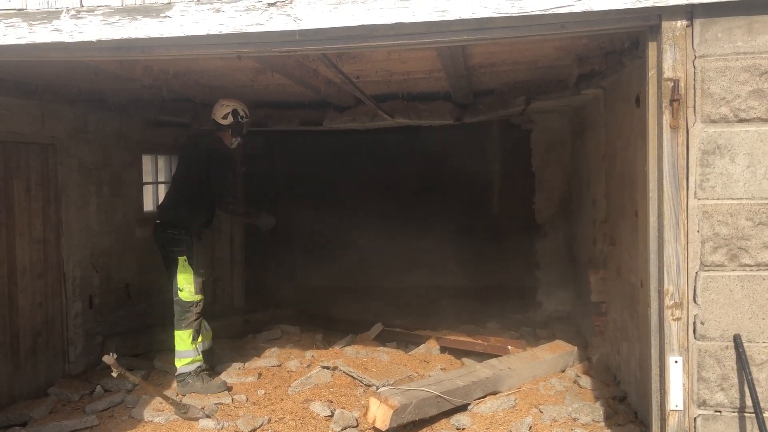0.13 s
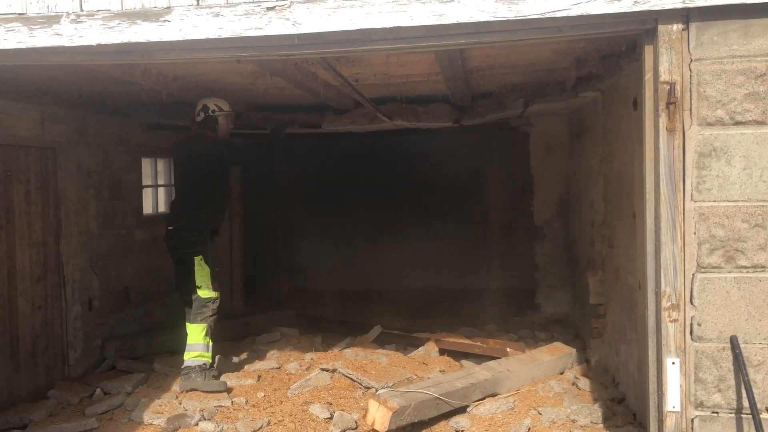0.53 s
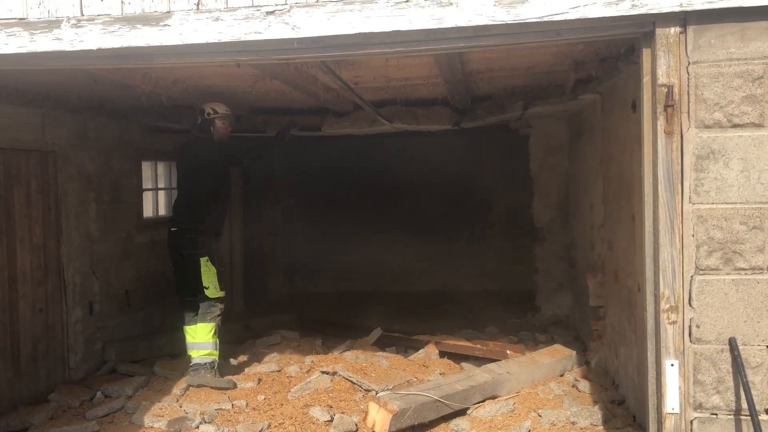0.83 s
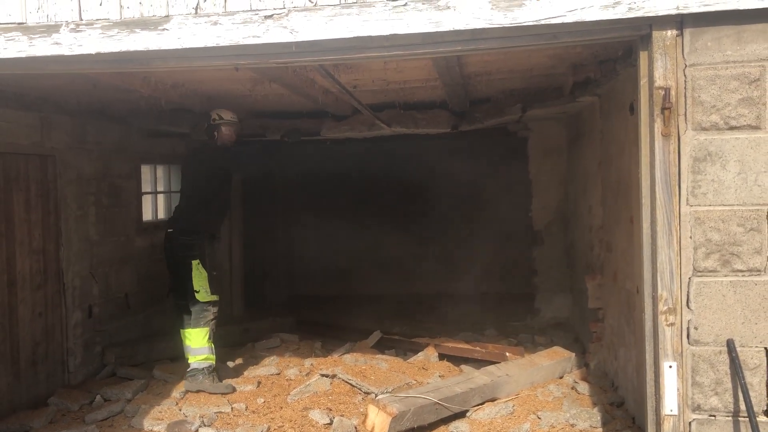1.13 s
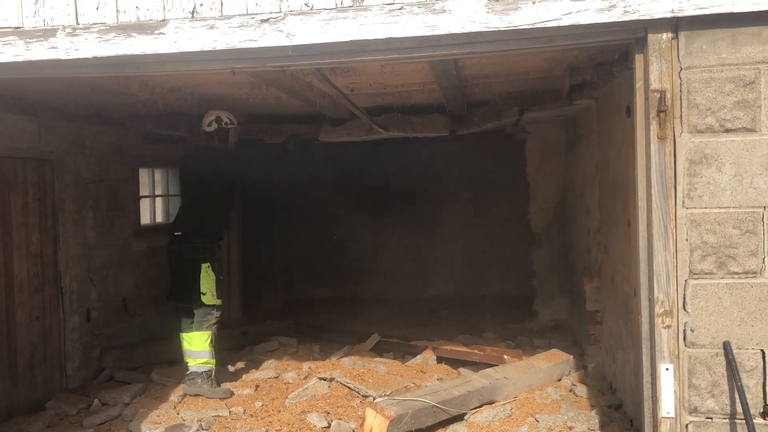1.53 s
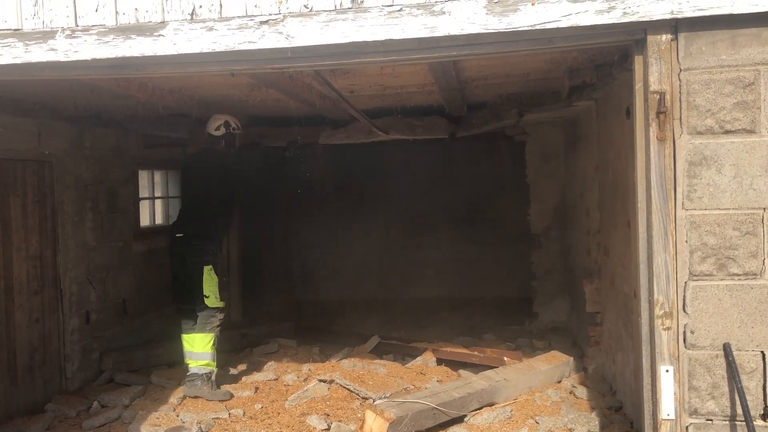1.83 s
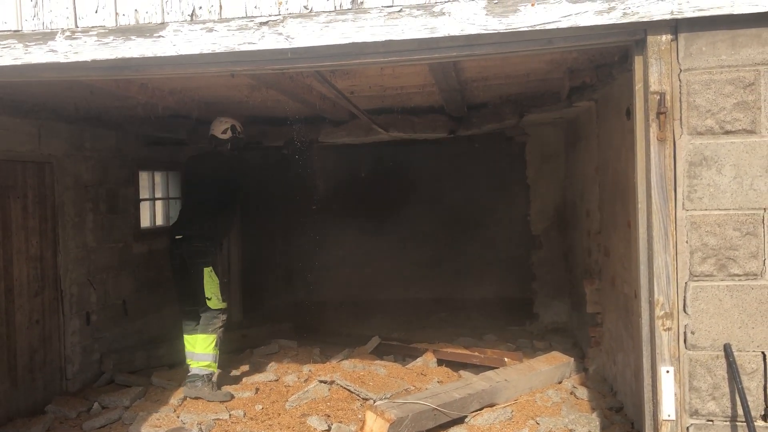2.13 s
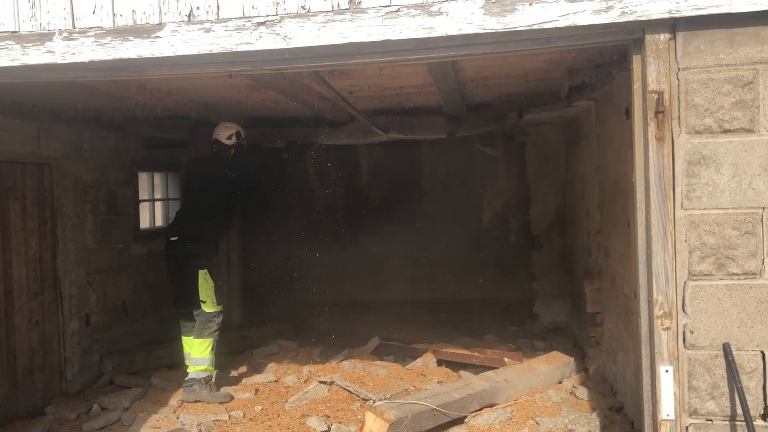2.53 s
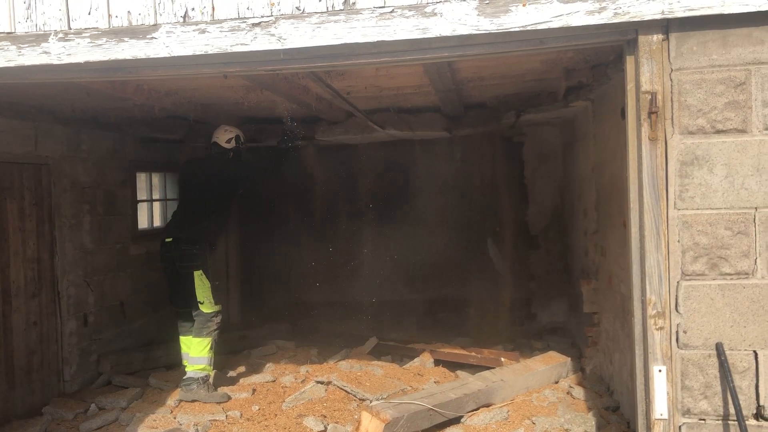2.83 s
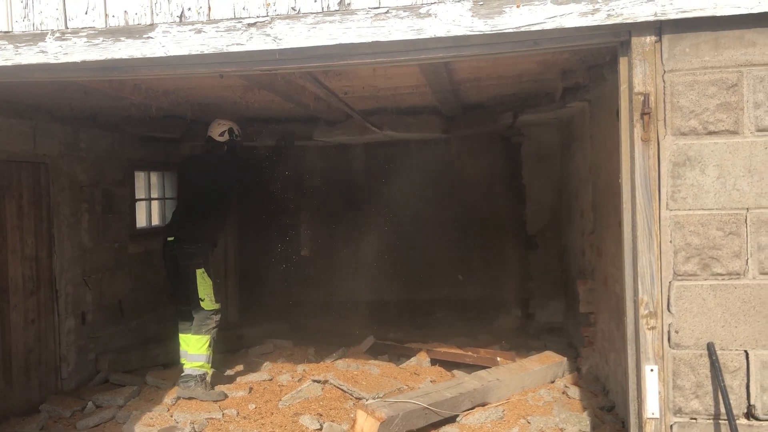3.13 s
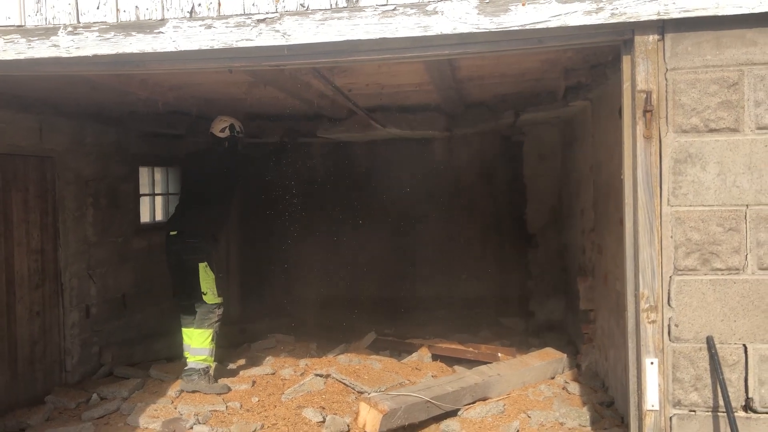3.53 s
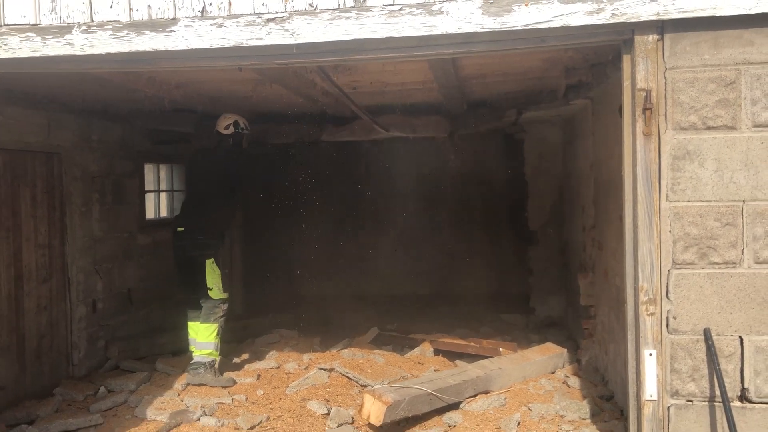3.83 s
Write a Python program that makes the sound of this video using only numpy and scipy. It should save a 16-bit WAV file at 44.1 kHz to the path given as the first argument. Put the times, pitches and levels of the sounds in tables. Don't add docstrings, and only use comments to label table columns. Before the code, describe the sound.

Falling debris, heard from outside a stone shed: a faint early knock, crumbs ticking, grit building, sharp dry creaks, then hard landings and board rattles near the end, with low wind buffeting the microphone.

```python
import sys
import numpy as np
from scipy import signal
from scipy.fft import rfft, irfft, next_fast_len
from scipy.io import wavfile
from scipy.ndimage import uniform_filter1d, map_coordinates

SR = 44100
rng = np.random.default_rng(int(sys.argv[2]) if len(sys.argv) > 2 else 0)


def boost(x):
    u = np.asarray(x, float) / 20
    return 10 ** u


def dump(signal):
    limited = np.clip(np.atleast_2d(signal).T, -1, 1)
    pcm = np.round(limited * 32767).astype(np.int16)
    wavfile.write(sys.argv[1], SR, pcm)


N = 176400


def unit(x):
    return x / np.sqrt(np.mean(x ** 2) + 1e-20)


def noise():
    return rng.standard_normal(N)


def along(points, hz):
    f, v = np.transpose(points)
    return np.interp(np.log(hz + 1), np.log(f + 1), v)


def curve(rows):
    s, db = np.transpose(rows)
    return boost(np.interp(np.arange(N) / SR, s, db))


def wobble(rate):
    knots = rng.standard_normal(int(5 * rate) + 4)
    return map_coordinates(knots, [np.arange(N) * rate / SR])


def filtered(x, response):
    m = next_fast_len(len(x) + 8192)
    return irfft(rfft(x, m) * response(np.fft.rfftfreq(m, 1 / SR)), m)[:len(x)]


def coloured(x, points):
    return unit(filtered(x, lambda hz: boost(along([(1, -120)] + list(points), hz))))


def resonant(x, peaks):
    def response(f):
        total = 0
        for k, (centre, width, db) in enumerate(peaks):
            damping = 1j * f * width
            total = total + (-1) ** k * boost(db) * damping / (centre * centre - f * f + damping)
        return total
    return filtered(x, response)


def crackle(per_s, scatter_db):
    chance, sign, size = rng.random((3, N))
    return (chance < per_s / SR) * np.sign(sign - .5) * boost(-scatter_db * np.log(size + 1e-9))


def add(out, s, x):
    part = out[max(round(s * SR), 0):][:len(x)]
    part += x[:len(part)]


def fading(rows):
    out, t = np.zeros(N), np.arange(SR // 2) / SR
    for s, db, t60 in rows:
        add(out, s, boost(db - 60 * t / abs(t60)))
    return out


# (time [s], peak [dB], body level [dB], ring t60 [s])
LANDINGS = [
    (0.342, -51, -18, 0.046),
    (.347, -35, 4.5, 0.1),
    (0.564, -41.5, -22, 0.12),
    (3.048, -25, -4.5, 0.047),
    (3.055, -30.5, -5, 0.041),
    (3.062, -34, 8.5, 0.073),
    (3.193, -36.5, -2, 0.11),
    (3.285, -37.5, 3.5, 0.16),
    (3.573, -38, 3.5, 0.065),
    (3.969, -43.5, 5.5, 0.18),
]
# (frequency [Hz], width [Hz], level [dB])
STONE_MODES = [(620, 200, 1), (1330, 370, 1), (1960, 820, -7), (2910, 590, -4.5)]
# (frequency [Hz], level [dB])
CRACK_COLOUR = [(1000, 9), (2500, -5.5), (6000, 3), (9000, -5.5), (13000, 0), (16000, -16)]


def knocks():
    crack_share = 0.44
    cracks = [(s, db, crack_share * t60) for s, db, _, t60 in LANDINGS]
    bodies = [(s, db + body_db, t60) for s, db, body_db, t60 in LANDINGS]
    crack = fading(cracks) * coloured(noise(), CRACK_COLOUR)
    body = fading(bodies) * unit(resonant(noise(), STONE_MODES))
    return crack + body


# (time [s], level [dB], pitch [Hz], t60 [s])
SCRAP_RINGS = [(3.053, -21.5, 196, .15), (3.0625, -26, 310, .1), (3.0615, -33, 2400, .06),
               (.116, -54, 2745, .18), (.114, -62, 4200, .1), (.535, -42, 1195, .05),
               (.349, -29, 1200, .09), (.348, -31, 1800, .06), (.36, -44, 2500, .2),
               (3.861, -43, 2880, .22), (3.621, -49, 900, 1.5), (3.66, -50, 715, .9),
               (3.289, -41, 4600, .08), (3.555, -43, 620, .2), (3.965, -41, 630, .15),
               (3.965, -44, 1210, .2), (3.153, -34, 1860, .09), (2.685, -43, 2400, .2),
               (3.962, -44, 6800, .08), (2.762, -36, 1950, .12), (3.6, -50, 5900, .7),
               (.648, -55, 3400, .15)]
# (frequency [Hz], level [dB])
BOARD_MODES = [(540, 0), (710, 1.5), (900, -1), (1070, 1), (1300, -1)]
# (time [s], level [dB])
BOARD_HITS = [
    (2.757, -43),
    (2.771, -37),
    (3.2508, -33),
    (3.258, -32),
    (3.269, -33.5),
    (3.3, -36),
    (3.459, -42),
    (3.565, -43),
]


def rings():
    board_t60_s, rise_s = 0.043, 0.00042
    rough_db, blur, blur_most = 2.5, 9, .04
    out, t = np.zeros(N), np.arange(SR // 2) / SR
    boards = [(s, db + level + 1.2 * rng.standard_normal(), hz, board_t60_s)
              for s, db in BOARD_HITS for hz, level in BOARD_MODES]
    rough, drift = wobble(90), wobble(160)
    for s, db, hz, t60 in list(SCRAP_RINGS) + boards:
        start = rng.integers(N - len(t))
        own = slice(start, start + len(t))
        drift_hz = min(blur / t60, blur_most * hz) * drift[own]
        envelope = boost(db - 60 * t / t60 + rough_db * rough[own]) * (1 - np.exp(-t / rise_s))
        phase = 2 * np.pi * np.cumsum(hz + drift_hz) / SR
        add(out, s, envelope * np.sin(phase))
    return out


# (time [s], length [s], level [dB], coarse crumbs relative level [dB])
SHOWERS = [(0.105, 0.029, -59.5, -17), (0.561, 0.037, -51.5, -22), (0.648, 0.021, -70, 10.5),
           (1.079, 0.091, -68, 7.5), (1.465, 0.096, -58.5, -2), (1.657, 0.088, -59.5, 3),
           (1.808, 0.11, -54.5, -1.5), (2.027, 0.084, -53, -2), (2.31, 0.042, -68, 7),
           (2.655, 0.024, -44, -12), (2.789, 0.028, -46.5, -15), (3.038, 0.02, -29.5, -9),
           (3.173, 0.068, -46, 1), (3.452, 0.025, -63, 18), (3.523, 0.066, -50, 9),
           (3.585, 0.096, -47.5, 5.5), (3.69, 0.11, -58.5, 8.5), (3.964, 0.071, -53, 12.5)]
# (frequency [Hz], level [dB])
COARSE_COLOUR = [(300, -77), (600, 8), (1200, 5.5), (2600, 3.5), (4500, -1), (8000, -13)]
# (frequency [Hz], level [dB])
GRIT_COLOUR = [(800, -22), (2000, 8.5), (3200, 8), (5500, 3), (8000, 2), (12500, 6.5), (15000, 1),
               (17000, -38)]


def crumbs(colour):
    impacts = crackle(2500, 2) + 0.25 * noise()
    return boost(1.8 * wobble(70)) * coloured(impacts, colour)


def showers():
    rise_share, fall_s = 0.43, 0.02
    t, fine, coarse = np.arange(SR // 3) / SR, np.zeros(N), np.zeros(N)
    for s, length, db, coarse_db in SHOWERS:
        rise = np.clip(t / (rise_share * length), 0, 1)
        fall = np.exp(-np.clip(t - length, 0, 1) / fall_s)
        shape = boost(db) * rise * fall
        add(fine, s, shape)
        add(coarse, s, boost(coarse_db) * shape)
    return fine * crumbs(GRIT_COLOUR) + coarse * crumbs(COARSE_COLOUR)


# (time [s], level [dB])
TRICKLE_LEVEL = [(0, -69.5), (.7, -66.5), (1.0, -72), (1.43, -66.5), (1.5, -64.5), (1.75, -58.5),
                 (2.02, -59.5), (2.3, -51), (2.55, -52), (2.85, -49), (3.0, -52.5), (3.2, -45), (3.5, -52),
                 (3.75, -51.5), (3.92, -52)]
GRAIN_HZ = [3500, 6500, 9500, 12800]


def trickle():
    grains = np.zeros(N)
    for hz in GRAIN_HZ:
        hiss = unit(resonant(noise(), [(hz, 0.51 * hz, 0)]))
        clicks = unit(resonant(crackle(90, 2), [(hz, 0.21 * hz, 0)]))
        grains += boost(1.33 * wobble(14)) * hiss + boost(-12 + 7.2 * wobble(8.2)) * clicks
    return curve(TRICKLE_LEVEL) * coloured(unit(grains) + 0.86 * noise(), GRIT_COLOUR)


# (time [s], peak [dB])
SINGLE_SLIPS = [(2.190, -37), (2.2715, -39), (2.277, -19), (2.2835, -20), (2.289, -25.5), (2.3255, -33),
                (2.364, -26.5), (2.370, -25), (2.54, -48), (2.608, -27), (2.615, -22), (2.6195, -25),
                (2.6265, -19.5), (2.632, -22), (2.634, -20), (2.639, -20), (2.6415, -25), (2.6465, -25),
                (2.6485, -20.5), (2.654, -17), (2.659, -17.5), (2.664, -24.5), (3.0275, -16.5), (3.033, -22),
                (3.041, -41)]
# (time [s], length [s], slip rate [1/s], level [dB])
SLIP_RUNS = [
    (1.872, .01, 150, -46),
    (2.229, .016, 610, -37),
    (2.7522, .037, 345, -26.5),
    (2.764, .024, 710, -35),
    (3.1505, .017, 385, -26),
    (3.946, .012, 130, -37),
    (3.968, .01, 170, -33),
]
# (frequency [Hz], width [Hz], level [dB])
CREAK_MODES = [(1364, 210, 10.5), (1933, 52, 13.5), (2110, 49, 1), (2420, 410, 1), (3770, 430, 3),
               (4700, 260, 2.5), (6540, 2100, -0.5), (10640, 1800, 3), (13150, 1900, 3.5)]


def creak():
    slip_t60_s, jitter = 0.0098, .12
    slips = list(SINGLE_SLIPS)
    for s, length, rate, db in SLIP_RUNS:
        chance = rng.standard_normal((40, 2))
        count = np.arange(40)
        times = (count + jitter * chance[:, 0] * (count > 0)) / rate
        slips += [(s + at, db + 0.9 * c) for at, c in zip(times, chance[:, 1]) if at < length]
    bursts = fading([(s, db, slip_t60_s) for s, db in slips]) * np.clip(noise(), -1, 1)
    return resonant(bursts, CREAK_MODES)


# (time [s], peak [dB])
TICKS = [(0.0868, -52), (0.2656, -49), (1.4813, -42), (1.504, -39), (1.522, -40), (1.6569, -30.5),
         (1.685, -43), (1.728, -42), (1.8118, -45), (1.854, -45), (1.9014, -38), (2.0527, -42),
         (2.0981, -41), (2.406, -42), (2.5342, -36.5), (2.5626, -48), (2.586, -34), (2.728, -33)]
# (frequency [Hz], width [Hz], level [dB])
TICK_MODES = [(5000, 9500, -7), (10100, 7400, 0.5), (13200, 3800, 2)]


def ticks():
    t60_s, level_db, echo_s, echo_db = .004, 6, .0056, -2
    clicks = []
    for s, db in TICKS:
        clicks.append((s, db + level_db, t60_s))
        clicks.append((s + echo_s, db + level_db + echo_db, t60_s))
    return resonant(fading(clicks) * np.sign(noise()), TICK_MODES)


# (frequency [Hz], t60 [s])
ROOM_T60 = [(300, 0.26), (2000, 0.35), (6000, 0.24), (14000, 0.26)]


def room(x):
    hz, t, z = signal.stft(rng.standard_normal(SR // 2), SR, nperseg=256)
    decay = boost(-60 * t / along(ROOM_T60, hz)[:, None])
    tail = signal.istft(z * decay, SR, nperseg=256)[1]
    delayed = np.pad(x, (250, 0))
    return signal.fftconvolve(delayed, tail / np.linalg.norm(tail))[:N]


# (time [s], level [dB])
GUSTS = [(0, -39.5), (.3, -32), (.39, -37.5), (.46, -27.5), (.53, -39.5), (.62, -36.5), (.8, -54),
         (.92, -39), (1.08, -55), (1.43, -59.5), (2.0, -56.5), (2.2, -47), (2.62, -31), (2.74, -38.5),
         (2.78, -49.5), (3.05, -41), (3.3, -51), (3.8, -40)]
# (frequency [Hz], level [dB])
BUFFET_COLOUR = [(22, -25), (42, -12), (62, -0.5), (105, -4.5), (180, -10.5), (320, -19.5), (900, -70),
                 (2000, -100)]
# (frequency [Hz], level [dB])
FLUTTER_COLOUR = [(120, 5), (280, 0.5), (500, -6), (1000, -25), (2500, -78)]


def buffeting():
    lumps = curve(GUSTS) * unit(boost(3.5 * wobble(45)))
    rumble = coloured(noise(), BUFFET_COLOUR)
    power = abs(uniform_filter1d(rumble ** 2, size=SR // 12))
    evened = rumble / np.sqrt(power + 0.037)
    flutter = lumps ** 1.616 * coloured(noise(), FLUTTER_COLOUR)
    return boost(2.5) * lumps * unit(evened) + boost(9) * flutter


# (time [s], peak [dB], pitch [Hz])
SLAPS = [(.02, -21, 71.4), (0.052, -31, 65), (.085, -25, 90), (0.148, -24, 66), (0.191, -23.5, 80),
         (.235, -23.5, 90.5), (.285, -25, 129), (0.308, -27, 77), (0.329, -26.5, 154), (.362, -27.5, 90),
         (.428, -28, 110), (0.452, -21, 118), (0.464, -21.5, 234), (0.478, -22.5, 129), (0.504, -27.5, 110),
         (0.584, -29.5, 99), (0.599, -30, 130), (.65, -34, 91), (0.899, -29.5, 100), (.96, -36, 245),
         (1.629, -37, 71.4), (1.74, -36, 87), (2.24, -28, 90), (2.379, -19.5, 114.3), (2.454, -23.5, 93),
         (2.521, -20, 252), (2.538, -13, 145), (2.553, -14.5, 237), (2.588, -16, 171), (2.6, -23, 110),
         (2.645, -15.5, 270), (2.66, -20.5, 136), (2.683, -24, 161), (2.71, -27, 89), (2.739, -44, 78),
         (2.896, -25.5, 101), (3.001, -26.5, 88), (3.29, -34, 88), (3.512, -33.5, 80), (3.63, -28.5, 59),
         (3.77, -27.5, 72), (3.825, -24.5, 61), (3.961, -34, 196)]
# (time [s], peak [dB])
SNAPS = [(.283, -32.5), (.328, -27), (.457, -23.5), (.463, -23.5), (.526, -39), (.894, -40.5), (2.374, -40),
         (2.541, -20.5), (2.549, -28), (2.587, -22.5), (2.617, -24.5), (2.64, -20.5), (2.65, -19),
         (2.661, -21.5), (2.888, -32.5)]


def slaps():
    slap_turns, snap_hz, snap_s = 0.63, 497, 0.00093
    packets = [(s, db, hz, slap_turns / hz) for s, db, hz in SLAPS]
    packets += [(s, db, snap_hz, snap_s) for s, db in SNAPS]
    out, t = np.zeros(N), np.arange(-1500, 1500) / SR
    for s, db, hz, width in packets:
        phase = 2 * np.pi * rng.random()
        packet = np.exp(-(t / width) ** 2) * np.cos(2 * np.pi * hz * t + phase)
        add(out, s + t[0], boost(db) * packet)
    return out


# (time [s], level [dB])
HUM_LEVEL = [(0, -57.5), (.75, -61), (1.4, -55.5), (1.55, -50.5), (2.1, -46.5), (2.55, -45), (3.3, -45),
             (4, -47.5)]
# (frequency [Hz], level [dB])
HUM_COLOUR = [(150, 1), (300, -3.5), (600, 0), (1000, -5), (1450, -4.5), (1900, -16), (3500, -23.5),
              (6000, -59)]


def hum():
    return curve(HUM_LEVEL) * boost(.8 * wobble(15)) * coloured(noise(), HUM_COLOUR)


def scene():
    inside = knocks() + rings() + showers()
    near = creak() + ticks()
    wet = room(boost(-7) * inside + boost(-10) * near)
    return (inside + near + wet + trickle() + hum() + buffeting() + slaps())[None]


def band_limit(x):
    return signal.sosfilt(signal.butter(12, 16510, fs=SR, output="sos"), x)


def record(dry):
    notch_hz, notch_width_hz, notch_db = 1650, 146, -8
    low_hz, shelf_hz, shelf_db, top_hz = 36, 15900, -34, 16450

    def response(hz):
        notch = notch_db * np.exp(-((hz - notch_hz) / notch_width_hz) ** 2)
        shelf = shelf_db * (hz > shelf_hz)
        bass_cut = np.sqrt(1 + (low_hz / (hz + 1)) ** 6)
        return boost(notch + shelf) * (hz < top_hz) / bass_cut
    return band_limit(filtered(dry[0], response)[None])


dry = scene()
out = record(dry)
dump(out)
```